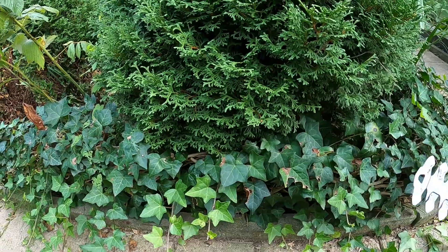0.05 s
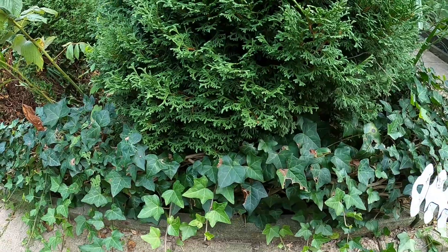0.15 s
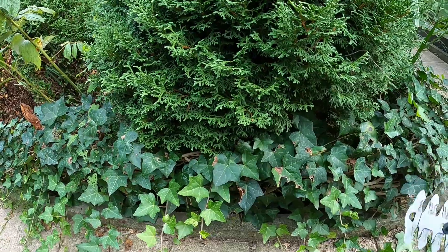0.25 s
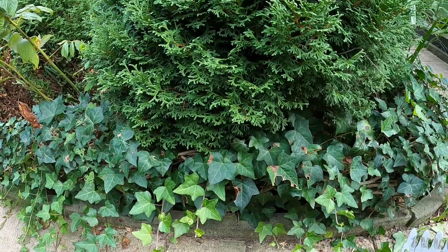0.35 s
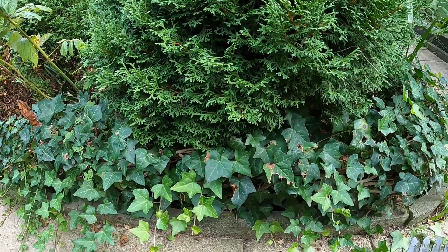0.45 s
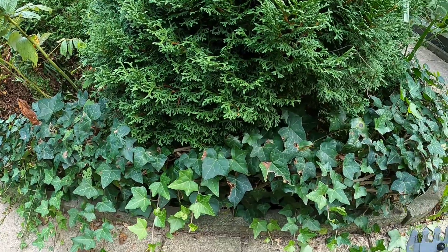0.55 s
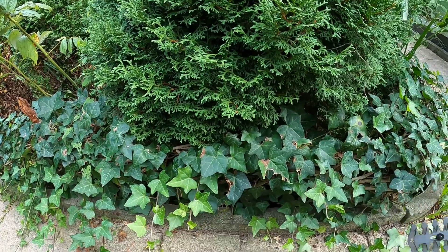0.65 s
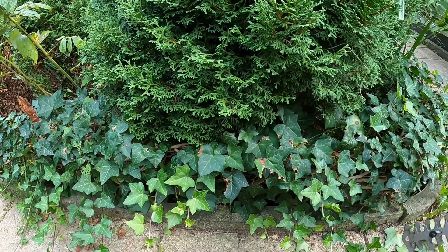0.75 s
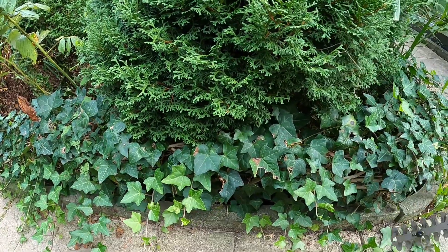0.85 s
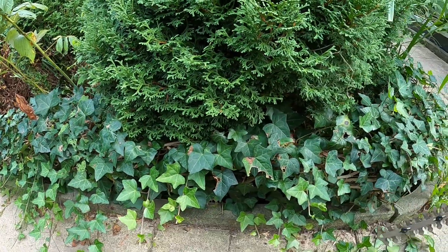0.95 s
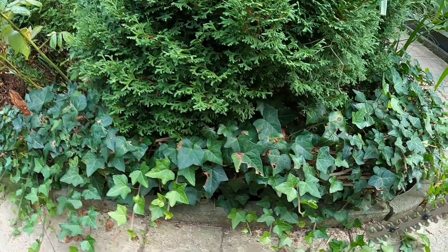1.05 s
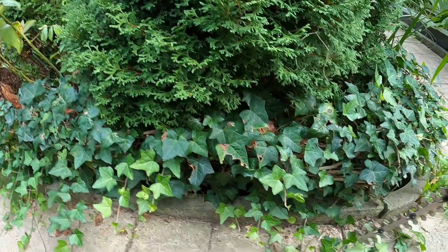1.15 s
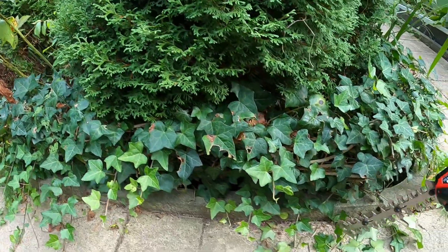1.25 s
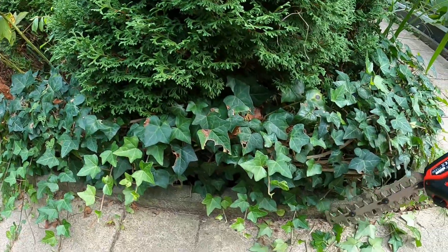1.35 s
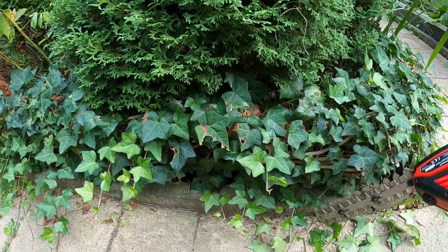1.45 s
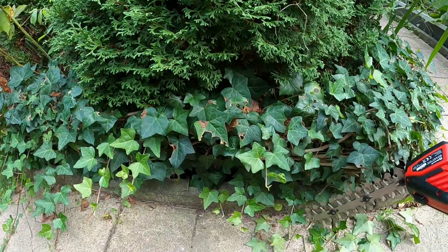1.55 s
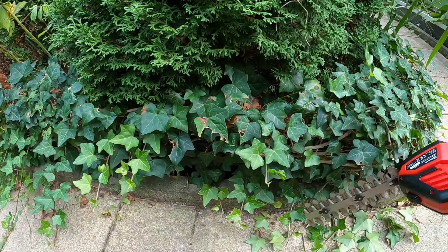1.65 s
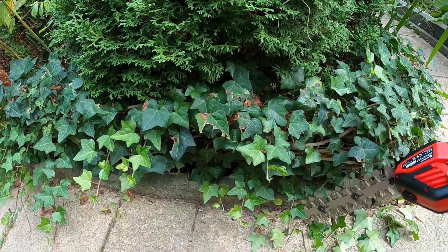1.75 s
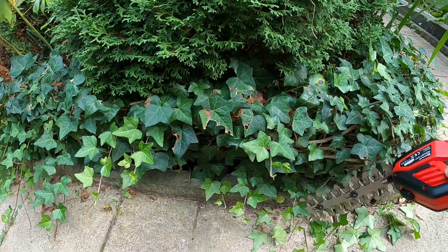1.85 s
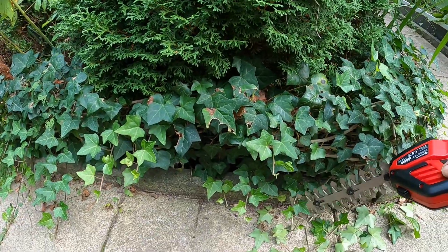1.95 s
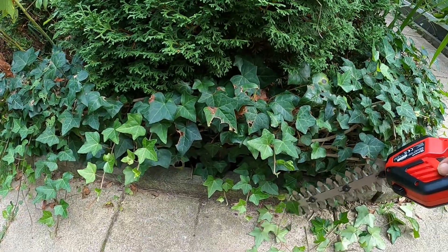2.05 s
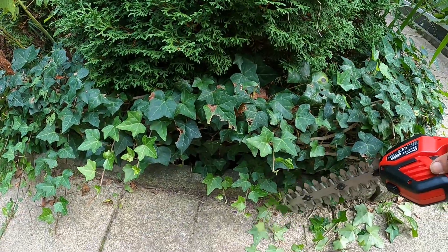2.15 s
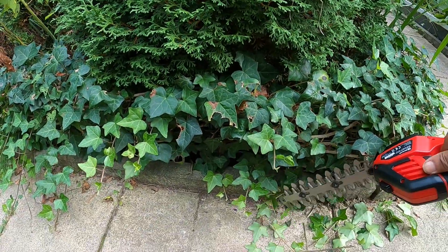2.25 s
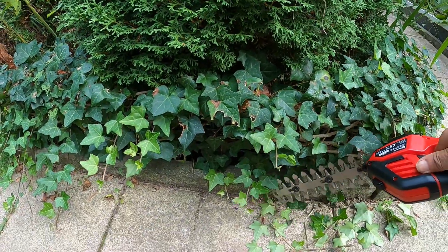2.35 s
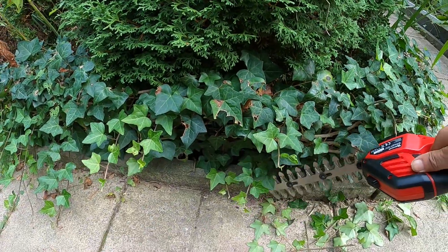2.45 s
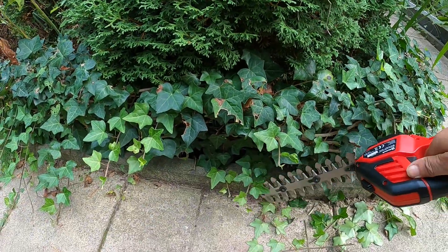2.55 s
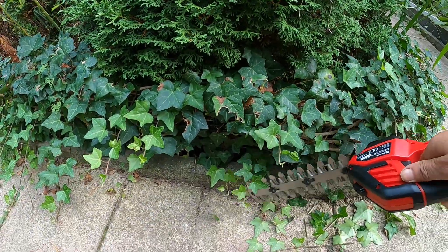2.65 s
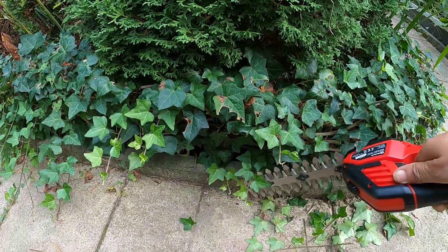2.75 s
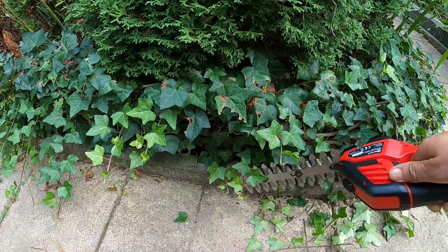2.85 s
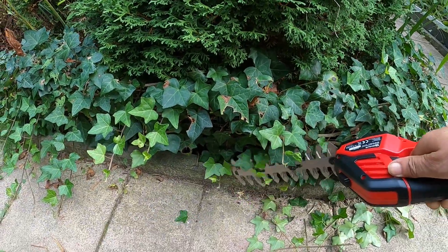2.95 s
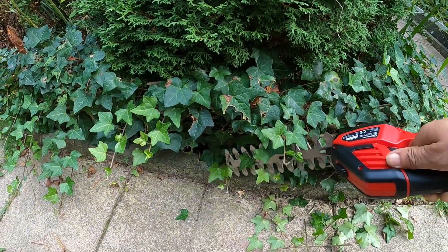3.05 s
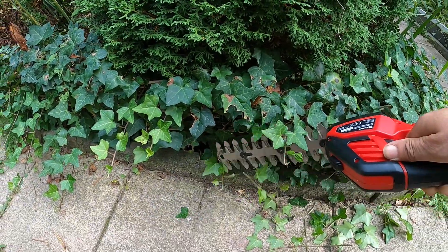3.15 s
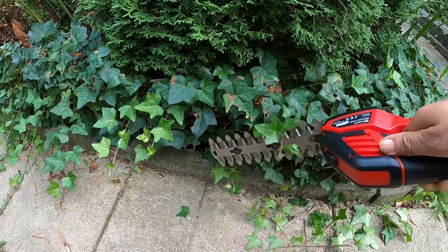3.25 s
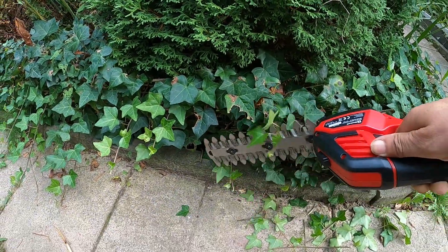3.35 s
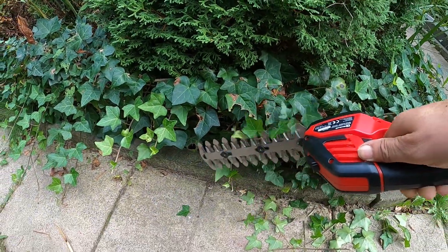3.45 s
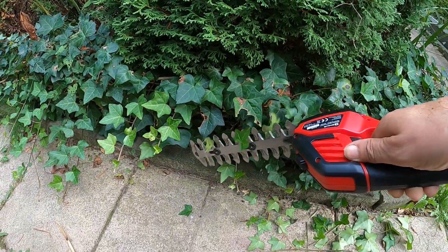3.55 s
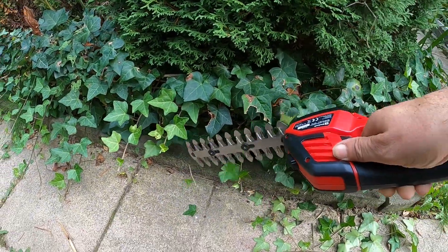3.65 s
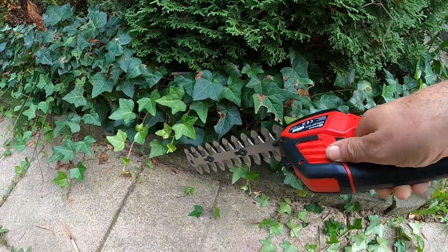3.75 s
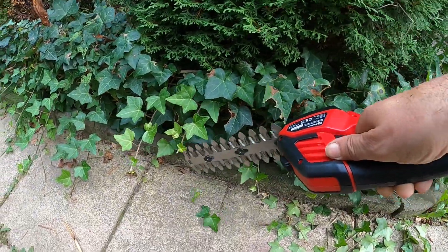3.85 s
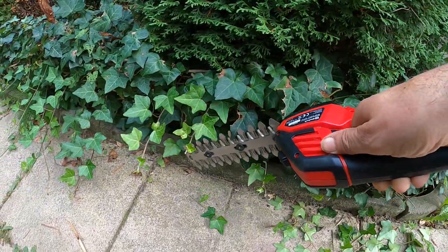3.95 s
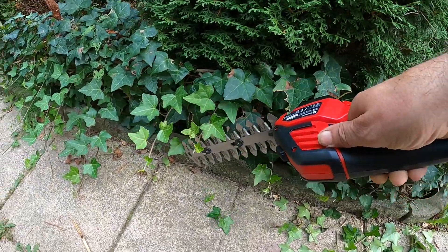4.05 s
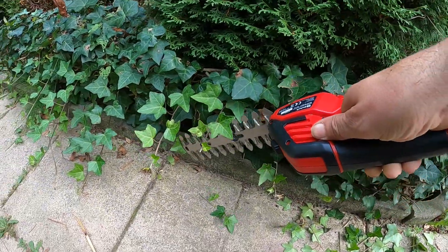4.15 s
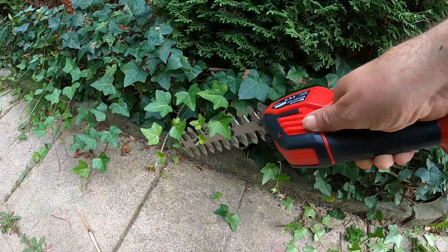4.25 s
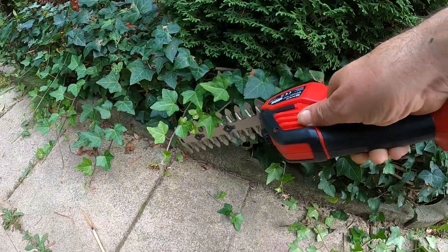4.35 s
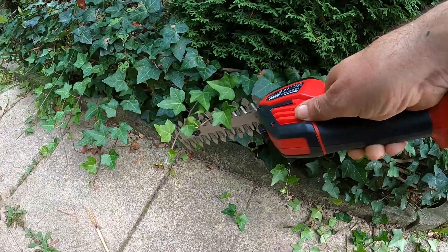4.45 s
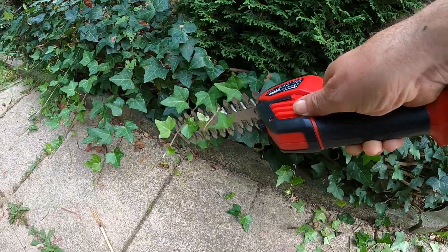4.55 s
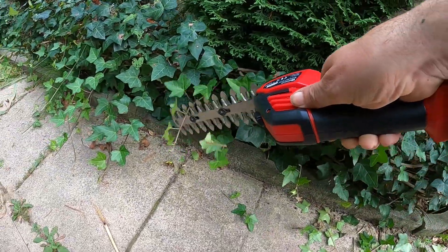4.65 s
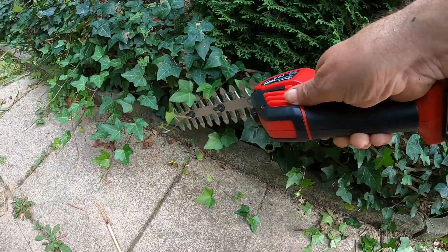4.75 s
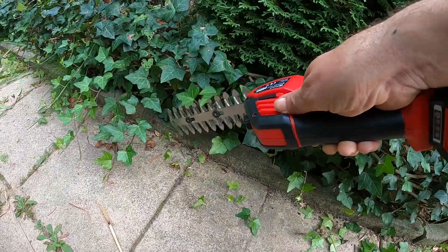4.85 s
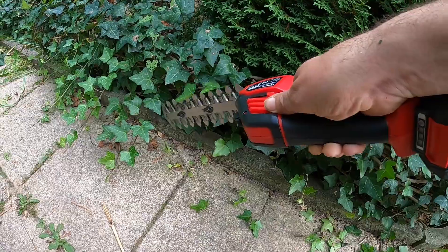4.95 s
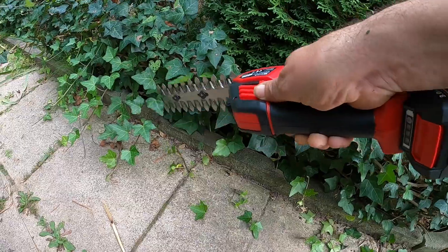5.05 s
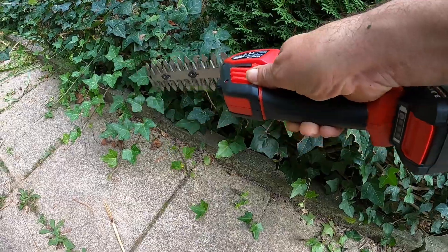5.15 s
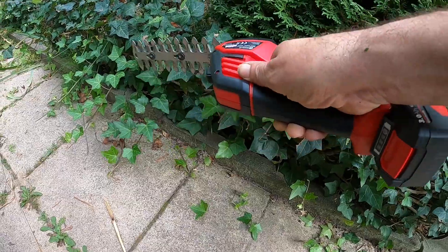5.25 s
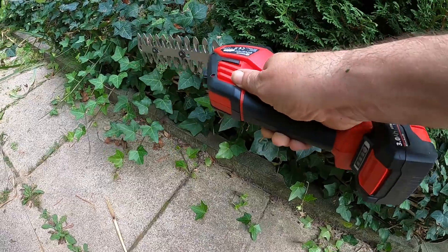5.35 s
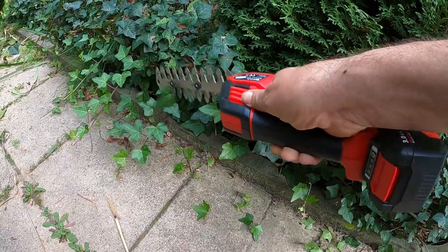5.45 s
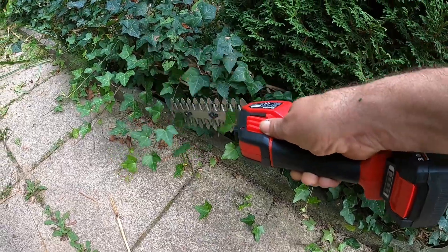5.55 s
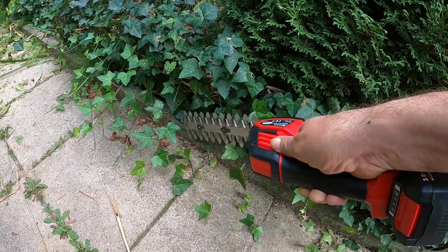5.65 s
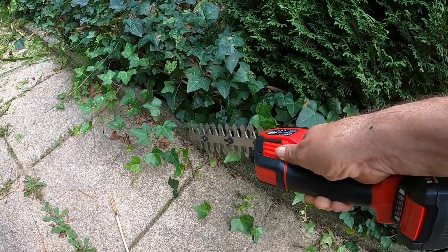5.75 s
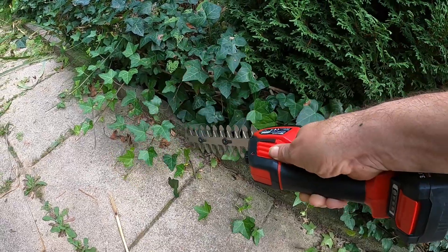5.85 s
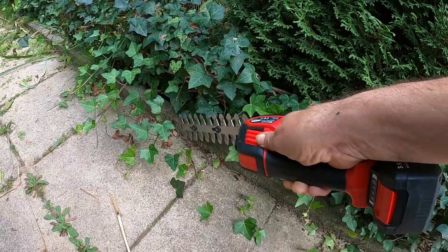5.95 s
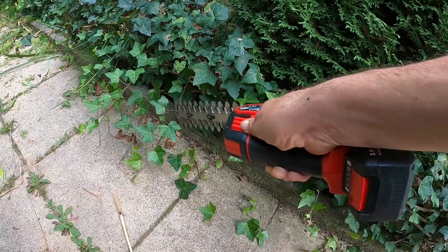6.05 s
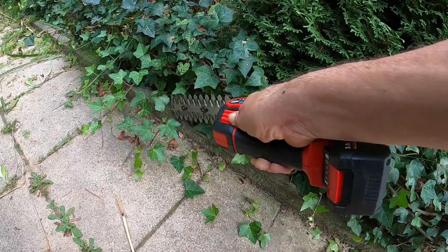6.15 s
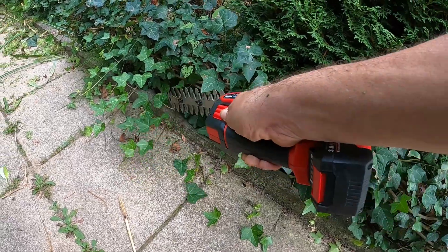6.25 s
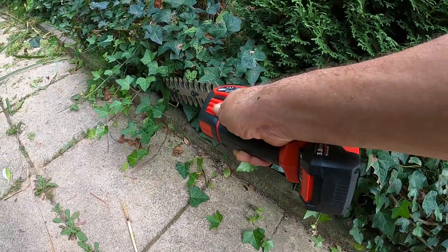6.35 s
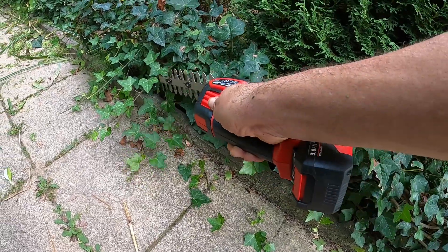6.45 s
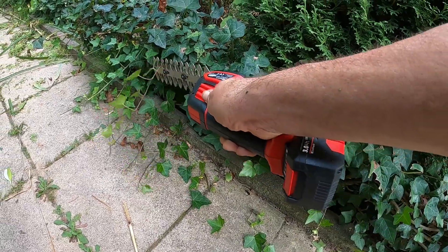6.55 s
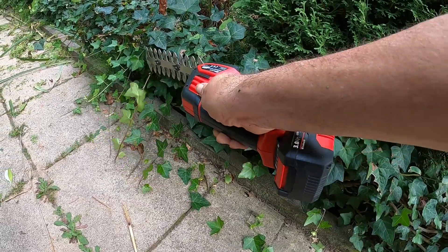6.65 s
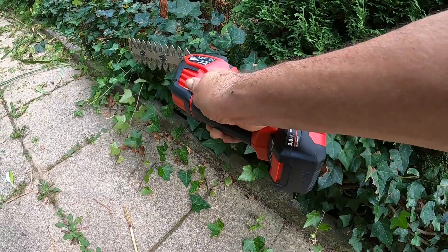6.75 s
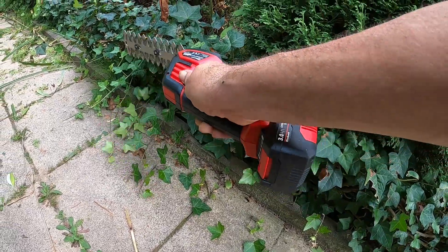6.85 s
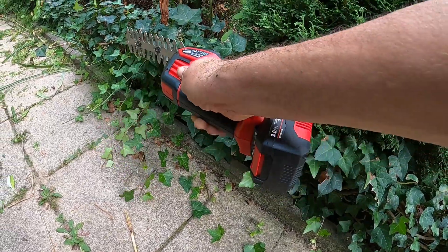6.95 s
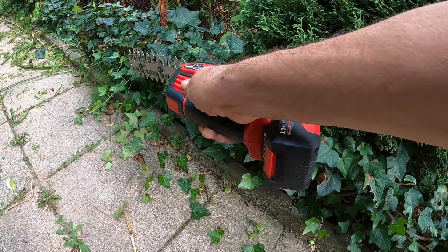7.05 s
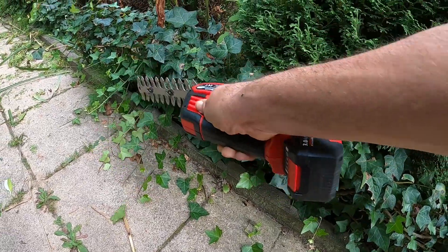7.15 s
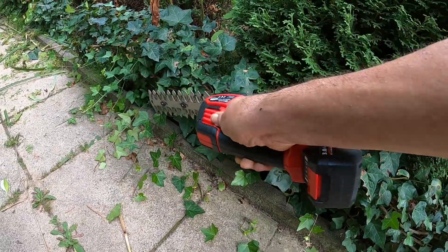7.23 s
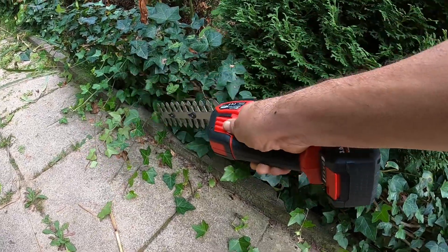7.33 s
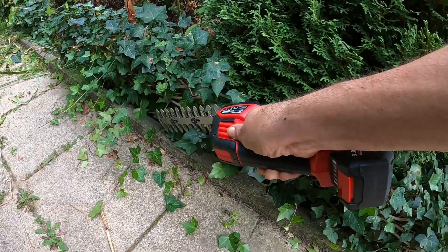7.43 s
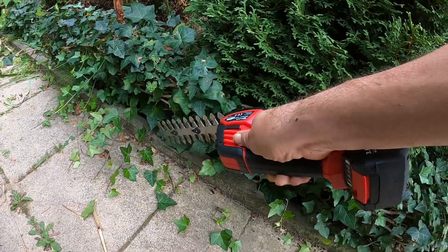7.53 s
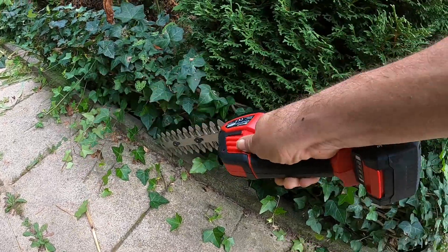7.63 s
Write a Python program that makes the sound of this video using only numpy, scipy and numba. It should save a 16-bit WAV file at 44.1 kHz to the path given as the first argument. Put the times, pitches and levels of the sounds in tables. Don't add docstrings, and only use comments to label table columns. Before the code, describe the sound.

Half a second of soft distant traffic with a barely audible high bird whistle, a small plastic snap, then a cordless hedge trimmer slams on close by. Its geared motor and reversing blades make a dense, dry, metallic rattling buzz at constant speed, dipping briefly as stems jam, with tiny bright cracks. Close stereo camera microphone in a paved garden; the traffic sinks beneath the tool, which is still running at the end.

```python
import sys
import numpy as np
from scipy import signal
from scipy.fft import rfft, irfft, next_fast_len
from scipy.io import wavfile
from scipy.ndimage import uniform_filter1d, map_coordinates
from numba import njit

SR = 44100
rng = np.random.default_rng(int(sys.argv[2]) if len(sys.argv) > 2 else 0)


def amplitude_ratio(level_db):
    exponent = np.asarray(level_db, float) / 20
    return 10 ** exponent


def materialize(psi):
    bounded = np.clip(np.atleast_2d(psi).T, -1, 1)
    quanta = np.round(bounded * 32767).astype(np.int16)
    wavfile.write(sys.argv[1], SR, quanta)


N = 339129
T = np.arange(N) / SR

MOTOR_HZ, PINION_TEETH, WHEEL_TEETH = 109.24, 9, 38
START_S = .622
PINION_TIGHT_TURN = .51

# freq_hz, left_minus_right_db
PORTS = [(60, 7), (110, 10), (200, -10), (380, -2.5), (700, -3.5), (1290, -4.5), (2380, -2), (4400, -2),
         (8120, -8), (15000, -25.5)]


def unit(x):
    return x / np.sqrt(np.mean(x ** 2))


def curves(table):
    time_s, *columns = np.transpose(table)
    return [np.interp(T, time_s, column) for column in columns]


def shape(x, gain_of_hz):
    size = next_fast_len(N)
    freq_hz = np.arange(size // 2 + 1) * SR / size + 1e-3
    return irfft(rfft(x, size) * gain_of_hz(freq_hz), size)[..., :N]


def colour(points, share=0.85):
    hz, db = np.transpose(points)
    return lambda f: amplitude_ratio(share * np.interp(np.log(f), np.log(hz), db))


def band(x, lo_hz, hi_hz, tint=np.ones_like):
    return shape(x, lambda f: tint(f) * (1 / (1 + (f / hi_hz) ** 6) - 1 / (1 + (f / lo_hz) ** 6)))


def walk(rate_hz):
    hold = int(SR / rate_hz)
    held = np.repeat(rng.standard_normal(N // hold + 1), 8)
    slewed = uniform_filter1d(uniform_filter1d(held, size=8), size=8)
    return 1.057 * np.interp(np.arange(N), np.arange(len(held)) * hold / 8, slewed)


def bump(middle_s, half_s):
    out = np.zeros(N)
    span = slice(max(int((middle_s - 4 * half_s) * SR), 0), int((middle_s + 4 * half_s) * SR))
    out[span] = np.exp(-((T[span] - middle_s) / half_s) ** 2)
    return out


@njit
def ring(x, turn, glide, keep):
    y = np.empty_like(x)
    for c in range(len(x)):
        z, p = 0j, turn
        for i in range(x.shape[1]):
            z = z * p * keep + (1 - keep) * x[c, i]
            p = p * glide
            y[c, i] = 2 * z.real
    return y


def beam(x, table, q):
    out = np.zeros_like(x)
    for hz, middle_s, half_s, db, glide_hz in table:
        first = max(int((middle_s - 2 * half_s) * SR), 0)
        span = slice(first, max(int((middle_s + 2 * half_s) * SR), 1))
        age_s = T[span] - middle_s
        steps_hz = np.array([hz + glide_hz * age_s[0], glide_hz / SR])
        turn, glide = np.exp(2j * np.pi * steps_hz / SR)
        rung = ring(x[:, span].copy(), turn, glide, np.exp(-np.pi * hz / q / SR))
        out[:, span] += rung * (amplitude_ratio(db) - 1) * np.exp(-(age_s / half_s) ** 2)
    return out


def road(ducked):
    # freq_hz, density_db_per_hz
    town = [(13, -24), (22, -9), (45, -2), (97, -7.5), (135, -7.5), (226, -9.5), (277, -17), (307, -15),
            (387, -39), (630, -28.5), (773, -35.5), (948, -27), (1940, -35.5), (5990, -60), (8200, -72),
            (9600, -93), (13000, -98), (15000, -117), (22000, -120)]
    # middle_s, half_length_s, gain_db
    lorries = [
        (0.085, 0.16, -0.5),
        (2.357, 0.17, 3.5),
        (2.844, 0.28, 0.5),
    ]
    # centre_hz, middle_s, half_length_s, gain_db, glide_hz_per_s
    car_bands = [(654, 0, 0.21, 6.5, 0), (615, 0.48, 0.22, -18, 0), (2500, 0, 0.17, 5.5, 0),
                 (3600, 0.25, 0.43, -8, 0), (4900, 0.39, 0.096, 3.5, 0), (4500, 0.63, .06, -5, 0),
                 (6500, 0.62, .08, -5, 0)]
    end_db, surplus_db, sink_s, duck_db = -49, 10.5, 3.2, -1.5
    tyres_db, tyres_duck_db = -5., -3.
    low_db = end_db + surplus_db * np.exp(-T / sink_s) + duck_db * (ducked - 1)
    low_db += sum(db * bump(s, half_s) for s, half_s, db in lorries)
    noise, sign = rng.standard_normal((2, N)), np.array([[1], [-1]])
    mid, side = band(noise, 5., 280.0, colour(town))
    rumble = mid + .14 * side * sign
    mid, side = band(noise, 363.0, 19000., colour(town))
    hum = mid * amplitude_ratio(1.7 * sign) + .5 * side * sign
    hum = hum + beam(hum, car_bands, q=5.2)
    hum_db = tyres_db + tyres_duck_db * ducked + .7 * walk(7.4)
    return amplitude_ratio(low_db - 1.0) * (unit(rumble) * amplitude_ratio(1.5 * walk(5.1)) + unit(hum) * amplitude_ratio(hum_db))


def engines():
    # start_hz, drift_hz_per_s, from_s, to_s, level_db
    notes_heard = [(41, -2, -2, .3, -33), (41, -3, .25, .85, -38), (125, 0, -2, .4, -41),
                   (160, -10, -2, .6, -42), (75, 0, -2, .35, -40), (218, 0, -2, .5, -46),
                   (185, 0, .1, .7, -48), (250, 0, .2, .7, -50), (160, 0, .65, 1, -47),
                   (280, 0, .6, 1, -51), (125, 0, .5, .8, -46), (36, -2, 1, 2.6, -48),
                   (70, -1.2, .9, 4.1, -51), (141, -2, 2, 3.5, -49), (210, -3, 2.6, 3.9, -56),
                   (285, -2, .9, 2.6, -57), (130, 0, 3.9, 4.7, -55), (45, 1, 5.1, 6.7, -50),
                   (180, 0, 5.1, 7.4, -54), (335, 0, 5.5, 7.9, -57), (88, 0, 4.95, 5.35, -50),
                   (88, 0, 7.1, 7.5, -50)]
    out = np.zeros(N)
    for hz, drift_hz, from_s, to_s, db in notes_heard:
        on = np.clip(np.minimum(T - from_s, to_s - T) / 0.082, 0, 1)
        pitch_hz = (hz + drift_hz * (T - max(from_s, 0))) * (1 + .015 * walk(4))
        turns = np.cumsum(pitch_hz) / SR
        out += on * amplitude_ratio(db + 4. * walk(12)) * np.sin(2 * np.pi * turns)
    return out


def traffic():
    ducked = 1 - np.exp(-np.clip(T - START_S, 0, None) / 0.94)
    return road(ducked) + engines()


def bird():
    # start_s, length_s, pitch_hz, level_db
    whistles = [
        (-.03, .07, 8600, -76),
        (.108, .075, 8300, -78),
    ]
    slide_hz, slide_up_s, slide_down_s = 1400., .005, .008
    out = np.zeros(N)
    for start_s, length_s, hz, db in whistles:
        age_s = np.clip(T - start_s, 0, length_s)
        slide = np.exp(-age_s / slide_up_s) + np.exp((age_s - length_s) / slide_down_s)
        on = np.clip(np.minimum(age_s, length_s - age_s) / .006, 0, 1)
        turns = np.cumsum(hz - slide_hz * slide) / SR
        out += np.sqrt(2) * amplitude_ratio(db) * on * np.sin(2 * np.pi * turns)
    return out


def catch():
    # start_s, peak_db
    snaps = [
        (.4885, -44.5),
        (.5594, -70),
    ]
    # mode_hz, level_db, t60_s
    modes = [(4850, 13, 0.009), (4850, -16, .09), (7300, -2, .008), (1200, 1, .07), (2600, 1, .008),
             (14000, -18, .008), (11000, -22, .03)]
    out = np.zeros(N)
    hiss = unit(band(rng.standard_normal(N), 1800., 9000.))
    for start_s, peak_db in snaps:
        age_s = np.clip(T - start_s, 0, None)
        snap = 1.3 * hiss * np.exp(-age_s / 0.002)
        for hz, db, t60_s in modes:
            snap += amplitude_ratio(db) * np.sin(2 * np.pi * hz * age_s) * np.exp(-np.log(1000) * age_s / t60_s)
        out += amplitude_ratio(peak_db) * snap * (T >= start_s) * np.clip(age_s / 0.002, 0, 1)
    return out * amplitude_ratio(np.array([[-3.], [3.]]))


def around(turns, at):
    return (turns - at + .5) % 1 - .5


def load_db(turns):
    stroke_db, pinion_db, bite_db, kick_db = 1.9, 2.1, 1.3, 1.7
    slack_db, slack_swing_db, slack_width_turn = 6., 7.5, .04
    wheel = turns * PINION_TEETH / WHEEL_TEETH
    stroke = stroke_db * np.cos(2 * np.pi * wheel)
    pinion = pinion_db * np.cos(2 * np.pi * (turns - PINION_TIGHT_TURN))
    bite = bite_db * np.cos(2 * np.pi * (turns - wheel - .4))
    slack = np.exp(-(around(wheel, .385) / slack_width_turn) ** 2)
    pull = np.cos(2 * np.pi * (turns - .72))
    away = around(wheel, .665) / slack_width_turn
    kick = kick_db * (np.exp(-away ** 2) - .5 * np.exp(-(np.abs(away) - 2) ** 2))
    return stroke + pinion + bite + kick - slack * (slack_db + slack_swing_db * pull)


def tooth_load(turns):
    # middle_s, half_length_s, gain_db
    jams = [(1.365, 0.0039, -4), (1.75, 0.0028, -5), (2.617, 0.0042, -9), (2.8, 0.0049, -7),
            (3.121, 0.0035, -9), (3.155, 0.022, -4), (3.503, 0.02, -4), (3.537, .004, -1),
            (3.651, 0.0042, -9), (3.768, 0.0019, -10), (4.225, 0.01, -4), (4.542, .004, -5),
            (4.814, 0.0029, -3), (4.932, .004, -1.5), (5.505, 0.0015, -13), (6.01, 0.0019, -12),
            (6.593, 0.0022, -18), (6.676, 0.0049, -4)]
    press_db = load_db(turns) + .5 * walk(80) + .9 * walk(160)
    press_db = 12. * (1 - np.exp(-press_db / 14.))
    press_db += sum(db * bump(s, half_s) for s, half_s, db in jams)
    return amplitude_ratio(np.maximum(press_db, -14.))


def gearing(turns, load):
    # pulses_per_turn, swing_db
    mesh = [
        (9, 1.),
        (10, .6),
        (5, .4),
    ]
    tooth = np.floor(turns * PINION_TEETH).astype(int)
    meets = np.diff(tooth, prepend=tooth[0]) > 0
    pairs = PINION_TEETH * WHEEL_TEETH
    wear = 0.071 + 0.12 * rng.standard_normal(PINION_TEETH)[tooth % PINION_TEETH]
    wear += 0.66 * rng.standard_normal(WHEEL_TEETH)[tooth % WHEEL_TEETH]
    wear += 0.7 * rng.standard_normal(pairs)[tooth % pairs]
    knocks = signal.sosfilt(signal.butter(2, 2600., fs=SR, output="sos"), meets * wear)
    ticks = (rng.random(N) < 6000. / SR) * rng.standard_normal(N)
    rattle = unit(unit(ticks) + 1.37 * rng.standard_normal(N))

    def repeat(f):
        share = .09 / (1 + (f / 4000.) ** 4)
        return 1 / (1 - share * np.exp(-2j * np.pi * f / MOTOR_HZ))

    rattle = shape(rattle, repeat)
    rattle = rattle * amplitude_ratio(sum(db * np.cos(2 * np.pi * k * turns) for k, db in mesh))
    return load * (unit(rattle) + amplitude_ratio(-17.) * unit(knocks))


def foliage(x, count):
    length = 700
    decay = np.exp(-np.arange(length) / SR / 0.087)
    spray = np.diff(rng.standard_normal((count, length)) * decay, axis=1)
    spray *= .3 / np.sqrt(np.sum(spray ** 2, axis=1))[:, None]
    step = N // (count - 1) + 1
    fade = np.sqrt(signal.windows.triang(2 * step))
    padded = np.pad(x, (step, 2 * step))
    out = np.pad(padded, (0, length))
    for k, echoes in enumerate(spray):
        wet = signal.fftconvolve(padded[k * step:(k + 2) * step] * fade, echoes)
        out[k * step:k * step + len(wet)] += wet
    return out[step:step + N]


def housing(push, load, turns):
    # freq_hz, density_db_per_hz
    body = [(180, -38), (300, -21.5), (400, -23), (650, -8), (850, -7.5), (1250, -4), (1750, -4.5),
            (2400, -3.5), (3400, -0.5), (4800, -4), (6400, -8), (9000, -17.5), (12500, -26), (14000, -24.5),
            (15600, -39)]
    # time_s, level_db, left_minus_right_db
    sweep = [(.65, -27, 1), (0.9, -29, -0.5), (1.01, -26, 1.5), (1.14, -24, 0), (2.34, -23.5, 0),
             (3.47, -23, 1), (3.91, -23, 2), (5.95, -23.5, 2), (6.17, -23.5, 4), (7.69, -22.5, 4)]
    # middle_s, half_length_s, gain_db
    jolts = [
        (.6357, 0.0013, 12),
        (0.642, 0.0025, 11),
        (.6565, 0.0017, 3.3),
    ]
    part_db, part_pan, part_feel = (-3.5, 0, -1.5, -28), (0.27, 1, 0.96, 0.43), (-.4, .12, -.25, -.45)
    part_wake_db, part_jolt = (5, 1, -7, -31), (.3, 1., 0.24, .2)
    edges_hz = (40., 1800., 4500., 8000., 19000.)
    main_db, pan_db = curves(sweep)
    pan_db = pan_db - pan_db.mean()
    jolt_db = sum(db * bump(s, half_s) for s, half_s, db in jolts)
    asleep = np.exp(-np.clip(T - START_S, 0, None) / 0.034)
    sides = np.array([[.5], [-.5]])
    scattered = .85 * shape(rng.standard_normal(N), lambda f: f / (f + 2600.))
    pair = shape(push + load * scattered * sides, colour(body))
    ports = colour(PORTS, share=sides)
    parts = []
    for lo_hz, hi_hz, db, pan, feel, wake_db, jolt in zip(
            edges_hz, edges_hz[1:], part_db, part_pan, part_feel, part_wake_db, part_jolt):
        part = unit(band(pair, lo_hz, hi_hz, ports)) * amplitude_ratio(db + pan * pan_db * sides)
        flutter_db = .8 * walk(90)
        parts.append(part * load ** feel * amplitude_ratio(flutter_db + wake_db * asleep + jolt * jolt_db))
    pull = np.cos(2 * np.pi * (turns - PINION_TIGHT_TURN))
    late_pull = np.cos(2 * np.pi * (turns - PINION_TIGHT_TURN - .22))
    drone = parts[0] * amplitude_ratio(1.4 * (late_pull - pull))
    rattle = parts[1] * amplitude_ratio(1.1 * pull)
    return (drone + rattle + sum(parts[2:])) * amplitude_ratio(main_db - 3.0)


def resonances(plain):
    # centre_hz, middle_s, half_length_s, gain_db, glide_hz_per_s
    panels = [(803, 0.88, 0.18, 11.5, 0), (2250, 0.82, 0.28, 11.5, 0), (650, .75, .12, 7, 0),
              (2100, 6.1, .2, 3.5, 0), (1900, 1.35, 0.2, 4.5, 0), (1590, 0.96, 0.23, 7, -4),
              (1240, 1.5, 0.31, 4, 80), (1283, 2.51, 0.96, 5.5, -110), (1070, 3.15, 0.26, 2.5, -100),
              (960, 3.9, 0.35, 5, -3), (1250, 4.35, 0.38, 5.5, -60), (1110, 5.14, 0.83, 5, 60),
              (1280, 5.3, 0.44, 6, 100), (1460, 6.2, 0.3, 7.5, 2), (1120, 6.18, 0.29, 7, 3),
              (940, 6.93, 0.34, 6.5, -60), (1330, 7.1, 0.57, 6, -150), (710, 7.3, 0.33, 3, 0),
              (790, 7.6, 0.18, 3.5, 0), (1480, 7.35, 0.14, 2, 0), (694, 4.5, 0.71, 2, 0)]
    bars = [(3590, 3.5, 0.24, 2.9, 0), (3600, 6.5, .25, 3.4, 0), (3230, 2.42, 0.34, 6.8, 0),
            (3540, 2.94, 0.42, 7, -350), (3790, 3.51, 0.11, 7.8, -300), (3270, 3.7, 0.23, 5.8, 144),
            (3700, 4.8, 0.84, 5.7, 0), (3290, 4.6, 0.96, 5.8, -100), (2193, 5.12, 0.55, 8.7, 0),
            (3270, 5.27, 0.19, 7.4, 5), (2780, 5.31, 0.41, 8.5, -2), (2790, 6.04, 0.25, 9.4, 2),
            (3080, 5.8, 0.12, 10.7, 200), (3540, 5.9, 0.21, 4.2, 300), (3260, 5.8, 0.45, 6.2, 0),
            (3370, 6.52, 0.13, 9.2, -5), (3540, 6.6, .12, 6.8, 494), (3720, 6.6, 0.2, 6.3, 0),
            (3520, 6, 0.054, 6.3, 0), (3110, 4.7, 0.11, 6, 0), (3330, 5.5, 0.13, 8.1, 2),
            (3800, 4, 0.037, 11, 0), (3720, 5.87, 0.062, 8.3, 0), (3460, 3.17, .08, 4.1, 0),
            (3850, 3.25, 0.091, 4.5, 5), (3480, 1.7, 0.062, 7.9, -5), (3300, 3.82, 0.083, 5, 0),
            (3760, 6.97, 0.11, 8.7, -500), (1950, 6.5, 0.57, 7.9, 0), (1960, 7.5, 0.22, 5.7, 0),
            (4000, 1.65, .3, 5.7, 0), (3860, 2.5, 0.46, 5.2, -100), (2880, 3.43, 0.22, 7.3, 0),
            (2560, 4.42, 0.17, 7.3, 0), (4280, 2.5, 0.2, 6, -2), (1970, 3.06, 0.25, 7.4, 0),
            (3620, 4.7, 0.35, 2.6, -200), (3280, 7.35, 0.28, 5, 0), (2700, 7.1, 0.33, 3.5, 0)]
    tines = [(2270, 0.83, .22, 8.5, 0), (2200, 1.13, .06, 4, 0), (1240, 2.17, .4, 4.5, -60),
             (1210, 3.1, .3, 1.5, 0), (3540, 2.95, .2, 2.5, -300), (2934, 0.82, 0.31, 9.5, 0),
             (3280, 1.34, 0.23, 4.5, 0), (3260, 1.75, .25, 3.5, 0), (3720, 1.32, .12, 4.5, 0),
             (3620, 1.92, .1, 1, 0)]
    blades = [(7800, 2.1, 0.37, 6.3, -7), (7720, 2.95, 0.23, 6, -200), (5630, 2.32, 0.57, 6.6, 60),
              (4640, 2.57, 0.54, 5.8, -200), (4620, 3.6, 0.31, 6, 0), (5700, 3.6, .25, 6, 0),
              (6160, 4.26, 0.28, 7.1, 100), (6150, 5.16, 0.22, 8.8, 0), (6040, 5.67, 0.21, 8.2, 100),
              (6100, 6.12, 0.19, 10.5, 500), (6240, 7.23, 0.96, 6, -250), (9000, 4.1, 0.29, 5.1, 200),
              (8600, 4.6, 0.11, 7.8, 0), (8350, 3.96, 0.31, 6.8, -4), (4720, 6.23, .2, 6.3, -5),
              (4910, 6.8, 0.65, 5.9, -300), (5900, 6.3, .25, 4.6, 0), (7150, 7, 0.3, 2.5, 58),
              (7560, 4.64, .3, 4.4, 0), (6400, 0.73, 0.38, 9.3, 0), (8000, 7.7, 0.34, 7.5, 0),
              (7640, 0.81, 0.81, 9.4, 0)]
    shadows = [(4270, 1.3, 0.33, -2.5, 0), (2700, 1.3, 0.29, -6, 200), (2500, 2.1, 1, -2.5, 2),
               (5200, 2.55, 0.78, -8, -200), (1460, 3.04, 0.65, -5, -100), (810, 2.95, 0.51, -3.5, 0),
               (5500, 3.6, 0.32, -7, 0), (5500, 4.28, 0.32, -8, 0), (5600, 4.92, 0.41, -10, 0),
               (5480, 6.04, 0.36, -14, 0), (1700, 6.15, 0.49, -16, 100), (4400, 6.7, 0.65, -4.5, 0),
               (2300, 7.9, .15, -8, 0), (1610, 3.9, 0.31, -1, 0), (1540, 4.38, 0.16, -8, 7),
               (2470, 4.2, .2, 2, -1), (3080, 5.4, 0.53, -5.5, -2), (6760, 2.45, 0.92, -4, 0)]
    out = beam(plain, panels, q=9.8)
    out += beam(plain, bars, q=36.5) + beam(plain, tines, q=36.5)
    return out + beam(plain, blades, q=33) + beam(plain, shadows, q=6.1)


def whine(turns, load):
    # multiple_of_motor, level_db, facing_s
    orders = [(8, -44, 4.2), (9, -41.5, 3.2), (10, -41.5, 1.4), (11, -42.5, 1.4), (12, -54, 2),
              (17, -53, 2), (18, -45, 1), (19, -54, 2), (20, -49, 4.5), (21, -54, 2), (30, -46.5, 1.4)]
    out = np.zeros(N)
    for k, db, facing_s in orders:
        shown_db = np.interp(T, (facing_s - .4, facing_s + .4), (-8., 0.))
        level = np.sqrt(2) * amplitude_ratio(db + shown_db + .9 * walk(3)) * np.sqrt(load)
        out += level * np.sin(2 * np.pi * k * turns + .8 * walk(3))
    return out


def trimmer():
    # time_s, delay_ms
    reach = [
        (0, -1.52),
        (2.2, -1.43),
        (3.5, 0.0097),
        (7.7, 0.25),
    ]
    delay_ms, = curves(reach)
    turns = MOTOR_HZ * (T - delay_ms / 1000) - .172
    load = tooth_load(turns)
    push = foliage(gearing(turns, load), count=16)
    plain = housing(push, load, turns)
    out = plain + resonances(plain) + whine(turns, load)
    lag_samples = 1.77 + 1.31 * np.exp(-np.clip(T - 1, 0, None) / 4.1)
    out[0] = map_coordinates(out[0], [np.arange(N) - lag_samples], order=3)
    rise_s = .02
    return out * np.clip((T - START_S) / rise_s, 0, 1) ** 1.2


def stems():
    # start_s, peak_db
    snapped = [(2.9362, -36), (3.712, -27), (4.1335, -29), (4.8733, -42), (5.0679, -35), (6.6733, -33),
               (6.791, -33), (6.8788, -33), (7.2375, -28)]
    crack = unit(band(rng.standard_normal(N), 7500., 12000.0))
    level = sum(amplitude_ratio(db - 6.0) * bump(s + 0.0018, 0.0016) for s, db in snapped)
    return crack * level * amplitude_ratio(np.array([[-4.], [4.]]))


def scene():
    return traffic() + bird() + catch() + trimmer() + stems()


def low_pass(x):
    return signal.sosfilt(signal.butter(12, 15640, fs=SR, output="sos"), x)


def record(dry):
    joint_hz, flip_top_hz, flip_until_s, ceiling = 6200, 10300, 2.06, .7
    treble = shape(dry, lambda f: 1. * (f > joint_hz))
    copy = shape(treble[1], colour(PORTS))
    left_power = uniform_filter1d(treble[0] ** 2, size=2048)
    copy_power = uniform_filter1d(copy ** 2, size=2048) + 1e-12
    joined = copy * np.sqrt(left_power / copy_power)
    joined -= 2 * shape(joined, lambda f: 1. * (f < flip_top_hz)) * (T < flip_until_s)
    left = dry[0] + (joined - treble[0]) * (T > START_S)
    mix = ceiling * np.tanh(np.array([left, dry[1]]) / ceiling)
    return low_pass(mix)


dry = scene()
out = record(dry)
materialize(out)
```